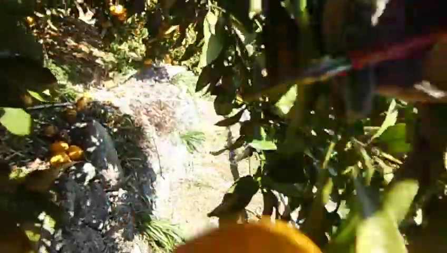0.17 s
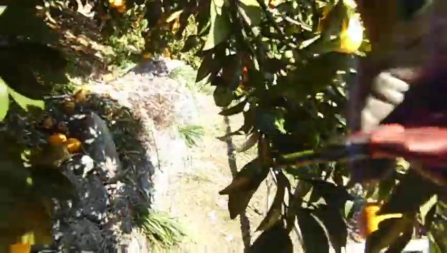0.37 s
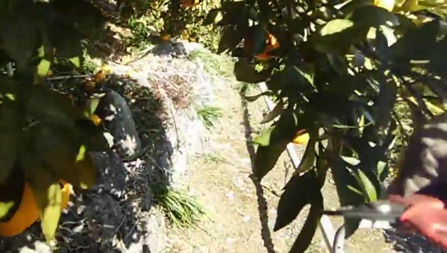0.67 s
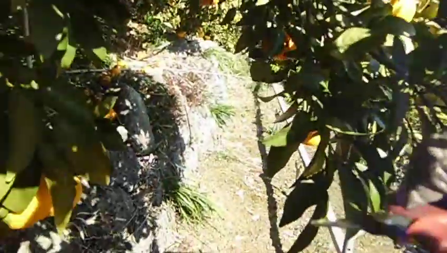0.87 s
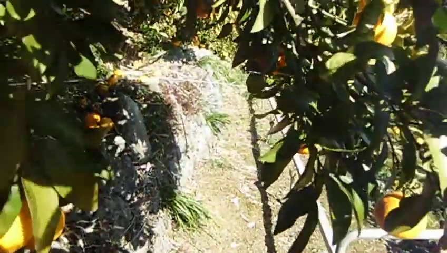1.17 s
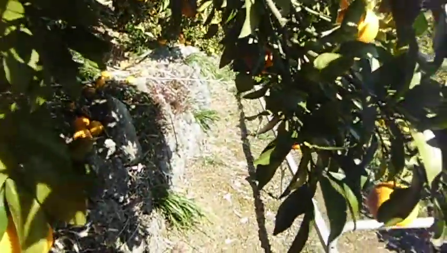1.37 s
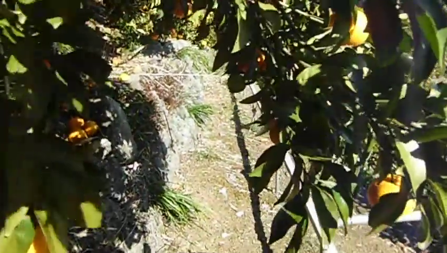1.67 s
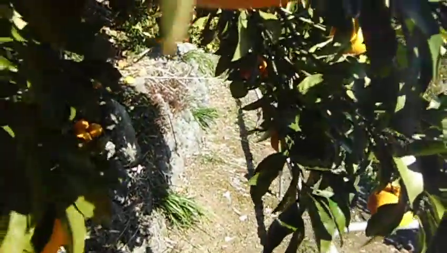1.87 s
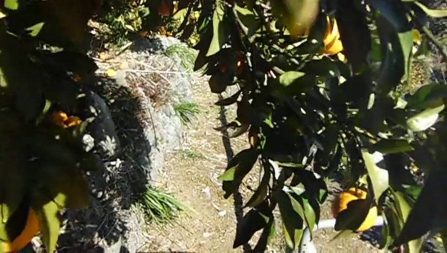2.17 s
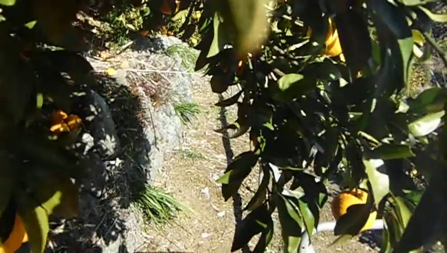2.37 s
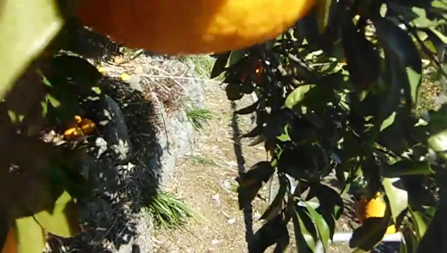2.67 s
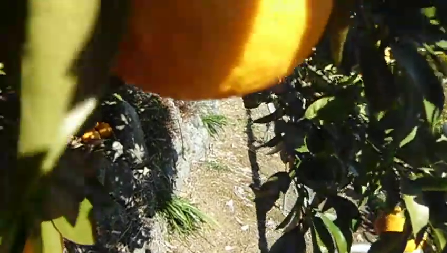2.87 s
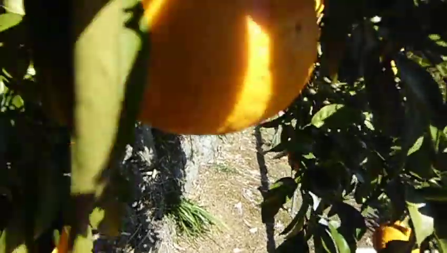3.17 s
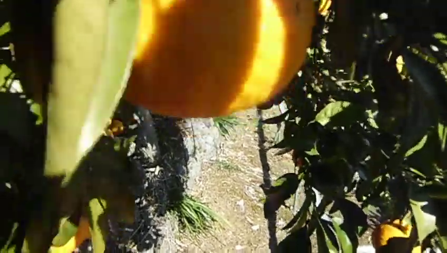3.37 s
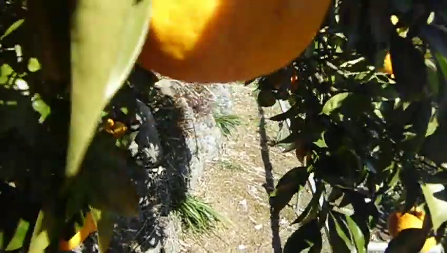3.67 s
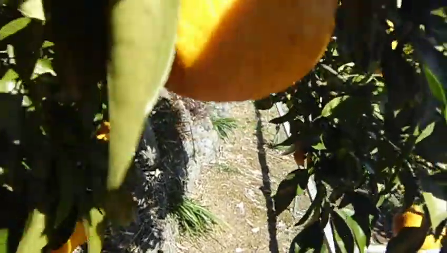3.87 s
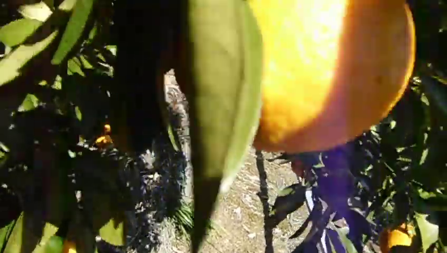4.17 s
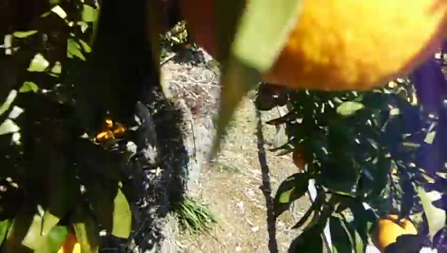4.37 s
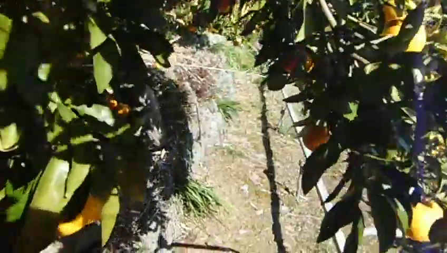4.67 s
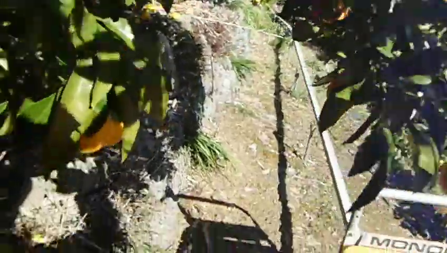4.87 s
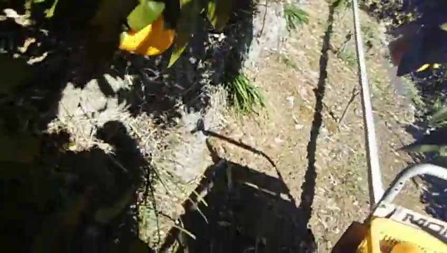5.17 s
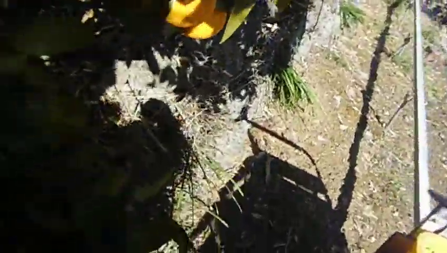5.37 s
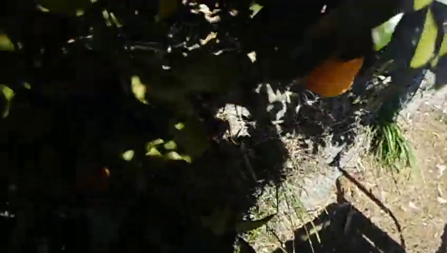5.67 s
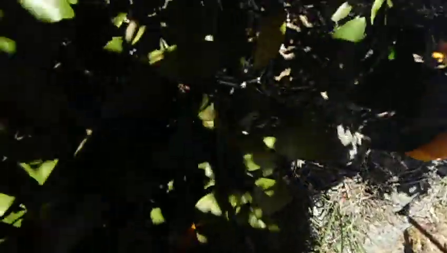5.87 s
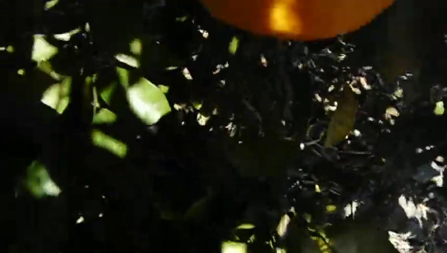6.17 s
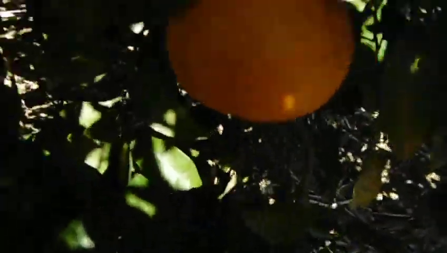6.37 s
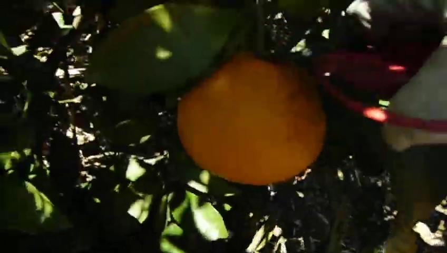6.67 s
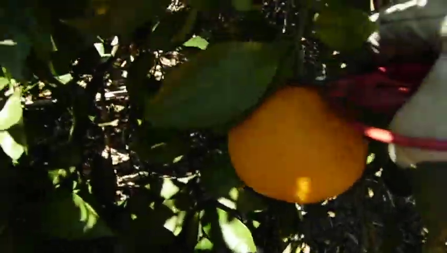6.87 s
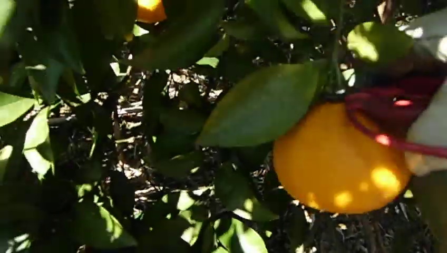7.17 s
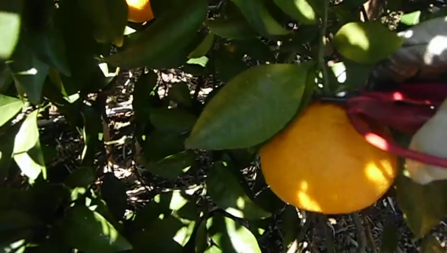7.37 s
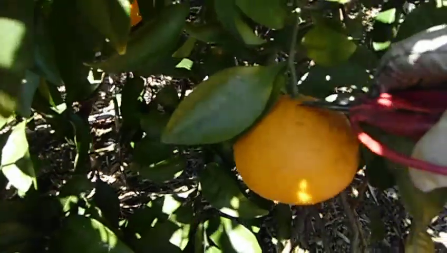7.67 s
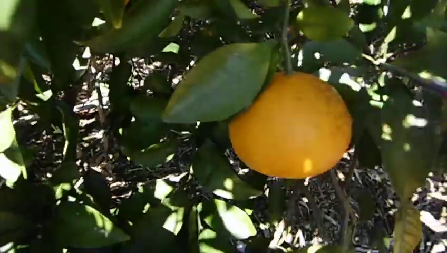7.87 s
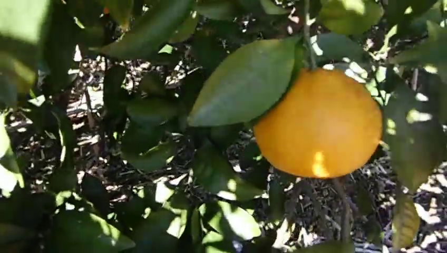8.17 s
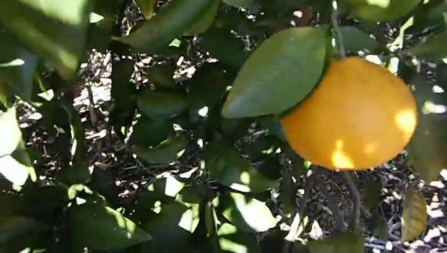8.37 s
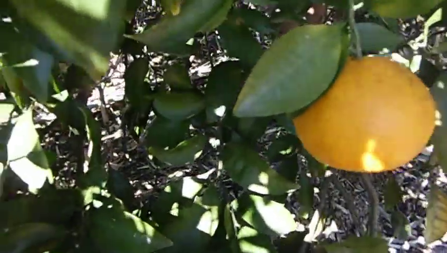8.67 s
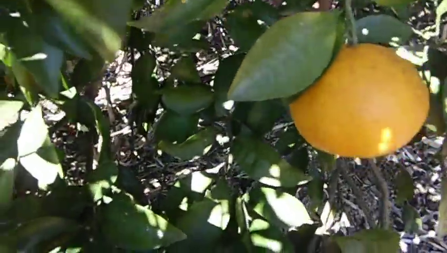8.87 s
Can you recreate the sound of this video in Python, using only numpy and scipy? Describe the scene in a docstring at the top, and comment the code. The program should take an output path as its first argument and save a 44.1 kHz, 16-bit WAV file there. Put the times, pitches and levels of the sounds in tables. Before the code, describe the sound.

Very close, dry and mono in a quiet outdoor orchard: shears crack through a stem at once, leaves hiss and settle, the blades squeak briefly as they open. Reaching through foliage gives uneven crackling and small taps. Midway, another sharp cut sets branches rustling, with low thumps just after. Then sparse rustles, a short metallic squeak and small dry clicks of the shears, over a faint low wash of air.

```python
"""A quiet hillside orchard: hand shears cut two oranges from a tree, close to the microphone.
Each stem gives way in a few quick cracks: noise bursts for the fibres, ringing sines for the blades.
Foliage is crackling noise that follows the arm and the freed branches; short noise hits tick among it.
Fruit and hand bump as low damped sines, twigs or handles ping, and the shears squeak now and then as
they are eased open. A low, steady noise is the open air."""
import sys
import numpy as np
from scipy import signal
from scipy.fft import rfft, irfft
from scipy.io import wavfile
from scipy.ndimage import uniform_filter1d

SR = 44100
rng = np.random.default_rng(int(sys.argv[2]) if len(sys.argv) > 2 else 0)


def wav_out(sig):
    """Save sig, one row per channel (or a flat mono array), as 16-bit PCM at SR to the path in sys.argv[1]."""
    wavfile.write(sys.argv[1], SR, np.round(np.clip(np.atleast_2d(sig).T, -1, 1) * 32767).astype(np.int16))


N = 397782


def amp(db):
    """Decibels to a linear gain."""
    return 10 ** (np.asarray(db) / 20)


def unit(x):
    """Scales to an RMS of one."""
    return x / np.sqrt(np.mean(x ** 2) + 1e-20)


def read_spectrum(points, hz):
    """Level in dB of a short spectrum, joined on a log-frequency axis."""
    point_hz, db = np.transpose(points)
    return np.interp(np.log(hz + 1), np.log(point_hz), db)


def add(mix, start_s, sound):
    """Lays a sound into the mix, cut off where the mix ends."""
    part = mix[max(round(start_s * SR), 0):][:len(sound)]
    part += sound[:len(part)]


def seconds(size):
    """Time axis in seconds."""
    return np.arange(size) / SR


def dying(t, t60):
    """Falls 60 dB in t60 seconds."""
    return np.exp(-np.log(1000) * t / max(t60, 1e-4))


def colour(x, points, size=2048):
    """Causal minimum-phase filter with the given spectrum: nothing sounds before the hit."""
    hz = abs(np.fft.fftfreq(size, 1 / SR))
    log_gain = np.log(amp(read_spectrum(points, hz)))
    response = np.exp(np.conj(signal.hilbert(log_gain)))
    return signal.oaconvolve(x, np.fft.ifft(response).real)[:len(x)]


def band(x, lo_hz, hi_hz, order=3):
    """Band-pass filter."""
    edges = [lo_hz, min(hi_hz, SR / 2 - 1)]
    return signal.sosfilt(signal.butter(order, edges, "band", fs=SR, output="sos"), x)


def smooth_noise(count, size):
    """Slowly wandering noise: white noise averaged over size samples."""
    return uniform_filter1d(rng.standard_normal(count), size=size)


def patchy(x, depth_db):
    """Every leaf has its own colour: patches in time and frequency swell and fade."""
    z = signal.stft(x, nperseg=256, noverlap=192)[2]
    field = uniform_filter1d(rng.standard_normal(z.shape), size=20, axis=1)
    field = uniform_filter1d(field, size=7, axis=0)
    return signal.istft(z * amp(depth_db * unit(field)), nperseg=256, noverlap=192)[1][:len(x)]


def smear(t, t60):
    """A tiny burst of splinters: spread in time, with an evenly flat spectrum before the last fade."""
    burst = rng.standard_normal(len(t)) * dying(t, t60)
    flat = irfft(np.exp(1j * np.angle(rfft(burst))), len(t))
    return flat * dying(t, 4 * t60)


def crackle(per_s, spread_db, smooth):
    """Countless tiny slips of leaf on leaf, a few much larger, over a smooth sliding noise."""
    sizes = amp(spread_db * np.minimum(rng.exponential(1, N), 4.5))
    slips = sizes * rng.choice([-1, 1], N) * (rng.random(N) < per_s / SR)
    grain = smear(seconds(400), t60=0.0027)
    return unit(unit(signal.oaconvolve(slips, grain)[:N]) + smooth * rng.standard_normal(N))


def clumps(depth_db, size):
    """Leaves catch and let go: the level swells unevenly from one moment to the next."""
    return amp(depth_db * unit(uniform_filter1d(smooth_noise(N, size), size=size)))


# Spectrum of the open air: (frequency [Hz], relative level [dB])
AIR_SPECTRUM = [(15, -10), (30, 3.5), (60, -1), (120, -7), (220, -11), (380, -12.5), (600, -18.5),
                (1100, -25), (2500, -53), (8000, -46.5), (16000, -45)]


def air(level_db=-64):
    """The low, steady wash of the open hillside: noise shaped by its spectrum."""
    gain = amp(read_spectrum(AIR_SPECTRUM, np.fft.rfftfreq(N, 1 / SR)))
    return amp(level_db) * unit(irfft(rfft(rng.standard_normal(N)) * gain, N))


# The arm pushing through the foliage: (time [s], rustle level before the hiss trim [dB])
ARM_REACH = [(0, -63), (.83, -83.5), (.92, -62.5), (1.12, -66.5), (1.55, -60.5), (1.85, -68), (1.97, -66.5),
             (2.3, -73.5), (2.66, -66), (2.78, -68), (3.0, -63.5), (3.3, -70), (3.56, -60), (3.73, -76),
             (3.92, -70), (4.12, -61.5), (4.25, -66), (5.15, -77.5), (5.6, -65), (5.98, -56), (6.15, -64),
             (6.68, -63.5), (6.88, -67.5), (6.98, -62.5), (7.25, -71), (7.75, -72.5), (8.2, -66.5),
             (8.85, -68.5), (9.02, -62.5)]
# Freed branches swinging into their neighbours:
# (time of the cut [s], level before the hiss trim [dB], time to settle by 60 dB [s])
REBOUNDS_AFTER_CUT = [(.027, -51, 2.5), (4.356, -53.5, 3)]
SWING_S = .088  # from the cut to the impact
FLURRY_S, FLURRY_DB = 0.12, 1.5  # spread around the impact, level relative to the rebound


def stirring():
    """Level of the moving leaves in dB: the arm's reach, plus a flurry and slow settling per cut."""
    t = seconds(N)
    power = amp(np.interp(t, *np.transpose(ARM_REACH))) ** 2
    for cut, db, settle_s in REBOUNDS_AFTER_CUT:
        since_impact = t - cut - SWING_S
        swing_in = np.clip((t - cut) / SWING_S, 0, 1)
        settling = swing_in * dying(np.maximum(since_impact, 0), settle_s)
        flurry = amp(FLURRY_DB) * np.exp(-(since_impact / FLURRY_S) ** 2)
        power = power + amp(db) ** 2 * (settling ** 2 + flurry ** 2)
    return 10 * np.log10(power)


# Bright hiss of sliding leaves: (frequency [Hz], relative level [dB])
HISS_SPECTRUM = [(1470, -39), (2500, -8), (3380, -3.5), (3890, -5.5), (7020, 1), (9580, 0.5), (11400, -2.5),
                 (14800, -12), (16000, -16.5)]
# Duller rub on the sleeve: (frequency [Hz], relative level [dB])
RUB_SPECTRUM = [(100, -9.5), (300, 6.5), (700, -0.5), (1100, 2), (1550, -2.5), (2200, -0.5), (3200, 0),
                (5000, -1), (9000, -33)]
# A branch whipping through the foliage: (time [s], level [dB], decay by 60 dB [s])
BRANCH_SWISHES = [(0.029, -32, 0.075), (4.356, -27, 0.089), (4.639, -28, 0.035), (4.669, -42, 0.41)]
# The rub is at RUB_DB when the stirring is at GENTLE_DB, and grows more slowly than it does
GENTLE_DB, RUB_DB, RUB_DB_PER_DB = -67, -69, 0.8242


def foliage(hiss_db=1.0, rub_db=0.0, twigs_db=-6):
    """Leaves slide and crackle as the arm moves, twigs catch; a freed branch swishes and settles."""
    hiss = stirring()
    rub = RUB_DB + RUB_DB_PER_DB * (hiss - GENTLE_DB)

    leaf_slips = crackle(per_s=1900, spread_db=4.0, smooth=1.4)
    sliding = unit(colour(patchy(leaf_slips, depth_db=2.5), HISS_SPECTRUM))
    sleeve_slips = crackle(per_s=550, spread_db=4.0, smooth=0.89)
    rubbing = unit(colour(patchy(sleeve_slips, depth_db=1.5), RUB_SPECTRUM))
    twig_slips = crackle(per_s=90, spread_db=2.5, smooth=0)
    twigs = unit(band(patchy(twig_slips, depth_db=4), 1800, 6500))

    brushing = amp(hiss_db + hiss) * sliding
    brushing += amp(rub_db + rub) * rubbing
    brushing += amp(twigs_db + rub) * twigs

    whip = np.zeros(N)  # loudness of the swishing branch
    for start, db, t60 in BRANCH_SWISHES:
        add(whip, start, amp(db) * dying(seconds(SR), t60))
    swish = colour(crackle(per_s=2800, spread_db=5.5, smooth=0.6),
                   [(100, 1), (1200, -9.0), (3500, -6.5), (8500, -6), (12000, -10), (16000, -28)])
    return brushing * clumps(depth_db=1.24, size=600) + whip * unit(swish)


# The low body, then three octaves of rattle: (lower edge [Hz], upper edge [Hz])
TAP_BAND_EDGES = [(230, 1300), (1950, 3600), (3600, 7300), (7500, 15000)]


def tap(db, tilt, body_db, t60, head_t60=0.0013, rattle_db=-6, tail_db=-33, tail_t60=0.025):
    """A sharp head, then a damped rattle that lasts longer in the bass, and a faint after-shiver."""
    t = seconds(3000)
    shake, out = rng.standard_normal(len(t)), np.zeros(len(t))
    shake[:12] = np.sign(shake[:12])  # the first contact chatters evenly
    for band_db, (lo, hi) in zip([body_db, -tilt, 0, tilt], TAP_BAND_EDGES):
        head = dying(t, head_t60)
        rattle = amp(rattle_db) * dying(t, t60 * (6000 / hi) ** 0.11)
        shiver = amp(tail_db) * dying(t, tail_t60)
        part = band(shake * (head + rattle + shiver), lo, hi)
        level = np.sqrt(.01 * SR) / np.linalg.norm(part)  # RMS of one if packed into 10 ms
        out += amp(db + band_db) * part * level
    return out


# Leaves, twigs and shears knocking together, before patches and final colour:
# (time [s], level [dB], tilt [dB per octave], low body relative to the rest [dB],
#  rattle decay by 60 dB before its band scaling [s])
KNOCKS = [(.0933, -49.5, 2, -22, 0.015), (0.104, -49, 2, -23, 0.011), (.233, -62, -6, -22, 0.014),
          (0.2919, -54.5, 0, -5, .04), (0.3375, -49, 0.5, -1.5, 0.22), (.3642, -52.5, 0, -12, 0.061),
          (0.3929, -59, -9.5, 6, 0.0089), (0.9342, -54.5, 2.5, -13, 0.042),
          (1.3957, -55.5, 2.5, -8, 0.0058), (1.5638, -43.5, 2.5, -13, 0.064), (1.9535, -55.5, 2, -7, .04),
          (1.9691, -58, 5, -8, .011), (3.0971, -53.5, 1.5, -2, 0.079), (3.1105, -59, 1.5, -2, 0.0061),
          (3.228, -68, -4, 5.5, 0.0053), (3.4086, -62.5, 5, -4, 0.0041), (3.466, -69, -6, 7.5, .015),
          (3.609, -58, 0.5, -10, 0.021), (4.3789, -37, 2.5, -10, .14), (4.408, -44.5, 4, -16, 0.033),
          (4.429, -44, 4.5, -8, .039), (4.6378, -44, 1.5, 1, 0.044), (4.6447, -45, -2, -16, 0.038),
          (4.6692, -58, -7, 10, 0.055), (4.6912, -47, 2, 3, .036), (4.7133, -55, -5, 7, 0.012),
          (4.7844, -53, -0.5, -4, 0.041), (4.8574, -50.5, -4.5, -3.5, 0.014),
          (5.065, -40.5, 11, -19, 0.0045), (5.4292, -57.5, -4, -8, 0.016), (5.52, -67.5, -11.5, 2, 0.02),
          (5.5519, -59, 9.5, -9, .025), (6.0053, -54, -0.5, 0.5, 0.092), (6.0472, -55, -7, -3, 0.023),
          (6.2691, -57.5, 6.5, -14, 0.2), (6.3875, -64.5, -5.5, 0, 0.024), (6.925, -58.5, -4, 1.5, 0.016),
          (6.9458, -59, 2, 0, 0.015), (7.258, -72, -10, 7, 0.026), (8.153, -55, 0, -7, 0.054),
          (8.3864, -51, 0, -9.5, 0.036), (8.5076, -63, -2, -1.5, 0.028), (8.941, -44.5, 8, -12, 0.033)]
# Light, dry clicks of the shears shifting in the hand, before patches and final colour:
# (time [s], level [dB])
SHEAR_CLICKS = [(7.4544, -58.5), (7.5763, -63.5), (7.6414, -65.5), (7.793, -63.5), (7.859, -57),
                (7.956, -61.5), (7.9952, -62.5), (8.071, -65), (8.1184, -56), (8.634, -54), (8.676, -60),
                (8.8714, -61.5), (8.979, -62), (9.0022, -57.5)]
CLICK_TILT_DB_PER_OCTAVE, CLICK_BODY_DB, CLICK_T60_S, CLICK_RATTLE_DB = 2.5, -27, 0.032, -2
# Faint stray taps; their level follows the arm's reach
STRAYS_PER_S, STRAY_OVER_REACH_DB, STRAY_SPREAD_DB = 4.0, -1, 2
STRAY_TILT_DB_PER_OCTAVE, STRAY_BODY_DB, STRAY_T60_S = 0.5, 0.5, 0.018  # tilt: the middle value


def ticks(top_db=-9, patchy_db=1.5):
    """Short noise hits: clear taps, clicks of the shears, and stray taps at random times."""
    out = np.zeros(N)
    for s, *blow in KNOCKS:
        add(out, s, tap(*blow))
    for s, db in SHEAR_CLICKS:
        click = tap(db, CLICK_TILT_DB_PER_OCTAVE, CLICK_BODY_DB, CLICK_T60_S, rattle_db=CLICK_RATTLE_DB)
        add(out, s, click)
    for s in rng.uniform(0, N / SR, round(STRAYS_PER_S * N / SR)):
        size_db, tilt = STRAY_SPREAD_DB * rng.standard_normal(2)
        db = np.interp(s, *np.transpose(ARM_REACH)) + STRAY_OVER_REACH_DB + size_db
        add(out, s, tap(db, STRAY_TILT_DB_PER_OCTAVE + tilt, STRAY_BODY_DB, STRAY_T60_S))
    return colour(patchy(out, patchy_db), [(3000, -1), (7000, 3.5), (10000, 2.0), (15000, top_db)])


# Soft bumps of fruit and hand: (time [s], level [dB], settled pitch [Hz], decay by 60 dB [s])
SOFT_BUMPS = [(0.337, -33, 85, 0.025), (.362, -41, 125, 0.072), (0.392, -43, 55, 0.37),
              (0.934, -54, 273, 0.16), (1.565, -40, 203, 0.025), (3.097, -47, 170, 0.036),
              (4.379, -41, 148, 0.039), (4.636, -35, 128, 0.032), (4.689, -26.5, 52.3, 0.051),
              (4.721, -34.5, 44.3, 0.1), (4.757, -40, 70, .05), (4.784, -37, 56.5, 0.17),
              (6.926, -37, 105, 0.058), (6.9456, -40, 191, 0.027), (7.06, -49, 90, 0.07)]


def bumps(scuff_db=-11, stiffness=3.3, give_s=0.0014):
    """A push, stiff at first, swings slower as it gives, with a dull scuff of skin and glove."""
    out, t = np.zeros(N), seconds(9000)
    swing = t + stiffness * give_s * (1 - np.exp(-t / give_s))  # runs fast, then at normal pace
    for s, db, hz, t60 in SOFT_BUMPS:
        scuff = unit(colour(rng.standard_normal(len(t)), [(40, 11), (150, 11), (400, -6.0), (900, -16),
                                                          (2500, -42.5), (8000, -59)]))
        push = np.sin(2 * np.pi * hz * swing)
        add(out, s, amp(db) * dying(t, t60) * (push + amp(scuff_db) * scuff))
    return out


# Knocks that leave a twig or a handle ringing:
# (time [s], level before the band-pass [dB], pitch [Hz], decay by 60 dB [s])
RINGING_KNOCKS = [(.2915, -41, 3900, .035), (2.7025, -44, 2500, .018), (5.0652, -30, 2450, .011),
                  (5.0650, -27, 4350, .006), (5.4296, -41, 2500, .016), (6.0478, -41, 2480, .02),
                  (8.9417, -31, 4280, .024), (4.6465, -35, 3080, .05), (4.6500, -43, 6030, .08),
                  (4.6762, -37, 860, .028), (4.7215, -44, 3030, .045), (8.8835, -45, 2970, .04)]


def pings(ragged=0.54):
    """One slightly ragged resonance dies away."""
    out, t = np.zeros(N), seconds(4000)
    for s, db, hz, t60 in RINGING_KNOCKS:
        waver = 1 + ragged * unit(smooth_noise(len(t), 60))
        ring = dying(t, t60) * waver * np.sin(2 * np.pi * hz * t)
        add(out, s, amp(db) * band(ring, hz / 2, hz * 2, order=2))
    return out


# The shears' pivot and spring rubbing:
# (time of the middle [s], level [dB], length [s], middle pitch [Hz], low creak relative to the squeak [dB])
PIVOT_SQUEAKS = [(.165, -50, 0.031, 2620, -20), (0.195, -44.5, 0.031, 2490, -18),
                 (0.225, -49, .028, 2650, -20), (5.047, -41, 0.024, 2950, -19),
                 (6.526, -72, .07, 3000, 11.5), (7.096, -51.5, 0.051, 3070, -7),
                 (7.1275, -40, .02, 2900, -11)]
# Resonances of a squeak: (ratio to the pitch [1], width before the shake factor [Hz], relative level [dB])
SQUEAK_RESONANCES = [(1, 60.3, 0), (1.17, 109, -8.5), (1.552, 118, -12)]
CREAK_HZ = 1147  # middle pitch of the low creak under each squeak
SQUEAK_SAG = 0.0303  # share of the pitch, above the middle at first and below it at last


def squeaks(shake=0.79, catch=0.42):
    """Rubbing metal swells and fades in narrow resonances above a low creak, sagging in pitch."""
    out, t = np.zeros(N), seconds(8192)
    from_middle = t - t.mean()
    for middle, db, length, hz, creak_db in PIVOT_SQUEAKS:
        swell = np.exp(-4 * abs(from_middle) / length)
        sag = 1 - SQUEAK_SAG * np.tanh(from_middle / length)
        creak = (CREAK_HZ / hz, 60, creak_db)
        for ratio, width_hz, level in list(SQUEAK_RESONANCES) + [creak]:
            slip = unit(smooth_noise(len(t), 120))
            grip = unit(smooth_noise(len(t), 120))
            pitch = hz * ratio * sag + shake * width_hz * slip  # uneven slipping shakes the pitch
            tone = np.sin(2 * np.pi * np.cumsum(pitch) / SR)
            add(out, middle - t.mean(), amp(db + level) * swell * (1 + catch * grip) * tone)
    return out


# Cracks of the stem between the blades:
# (time [s], gain [dB], low woody part relative to the treble [dB])
STEM_CRACKS = [(.0243, -10, -6), (.0258, -3, -4), (.0271, 0, -5), (.0282, -3, 2), (4.3484, -24, -6),
               (4.3517, -8, -9), (4.3532, -3, -9), (4.3551, -1, -3)]
# Blades and handles, damped by the hand: (frequency [Hz], relative level [dB], decay by 60 dB [s])
BLADE_MODES = [(2090, -6, .015), (2800, -8, .018), (3280, -9, .018), (3670, -12, .02), (4660, -9, .018),
               (5620, -8, .018), (6500, -11, .02), (6900, -8, .02), (7430, -9, .024), (8470, -6, .022),
               (9050, -7, .022), (9530, -4, .022), (10300, -2, .018), (11380, -1, .014), (12040, -5, .012),
               (13900, -11, .01)]
# Colour of the splitting fibres: (frequency [Hz], gain [dB])
FIBRE_SPECTRUM = [(60, -23.5), (300, -7.5), (800, -9.5), (1250, 3.5), (1550, -4), (2100, 10), (4000, -3),
                  (8000, 2.5), (11000, 7), (14500, -7), (16500, -15)]
SPLINTERS = 2.6  # strength of the splitting fibres


def snips(ring_db=-16, scatter_db=-38, scatter_t60=0.061):
    """Fibres snap one after another and ring the blades; nearby leaves scatter the sound back."""
    out, t = np.zeros(N), seconds(4000)
    ring = np.zeros(len(t))
    for k, (hz, level, t60) in enumerate(BLADE_MODES):
        ring += (-1) ** k * amp(level) * dying(t, t60) * np.sin(2 * np.pi * hz * t)
    for s, db, woody_db in STEM_CRACKS:
        scatter = amp(scatter_db) * dying(t, scatter_t60) * rng.standard_normal(len(t))
        fibres = colour(SPLINTERS * smear(t, t60=0.013) + scatter, FIBRE_SPECTRUM)
        crack = amp(ring_db) * ring + fibres
        add(out, s, amp(db) * colour(crack, [(2300, woody_db), (5000, 0.0017)]))
    return out


def scene():
    """All layers together, in one channel."""
    return (snips() + pings() + foliage() + bumps() + squeaks() + air() + ticks())[None]


EDGE_HZ = 16100  # upper edge of the band


def record(dry):
    """Rounds the loudest peaks, limits the band and rests slightly off zero."""
    ceiling, offset = .8, .0069
    rounded = dry / (1 + (dry / ceiling) ** 4) ** .25
    low_pass = signal.firwin(255, EDGE_HZ, window=("kaiser", 8), fs=SR)
    return signal.oaconvolve(rounded, low_pass[None], "same") + offset


dry = scene()
out = record(dry)
wav_out(out)
```